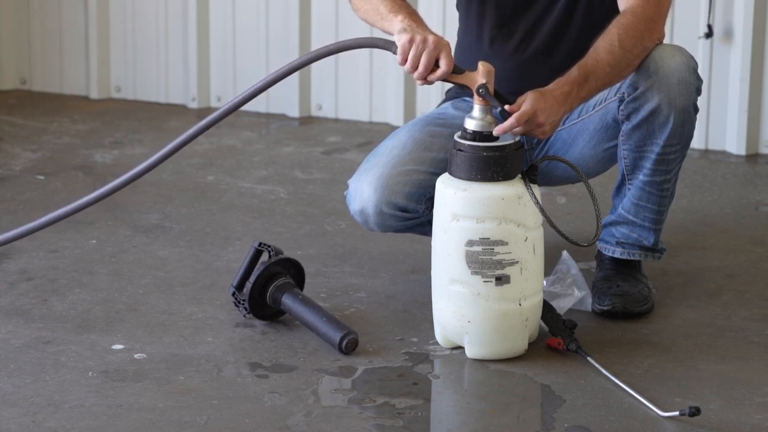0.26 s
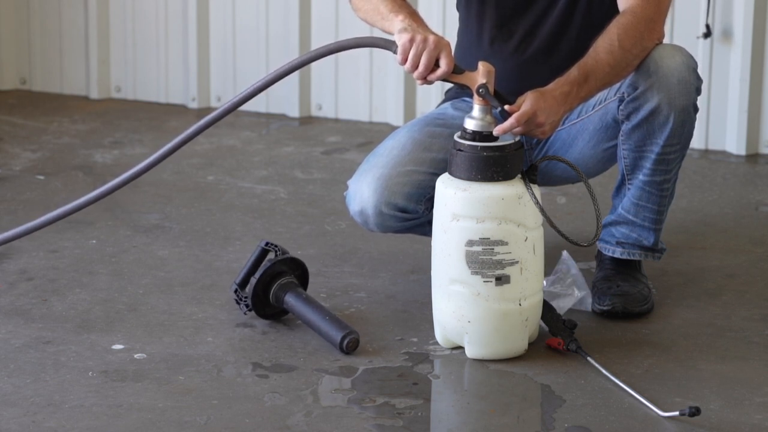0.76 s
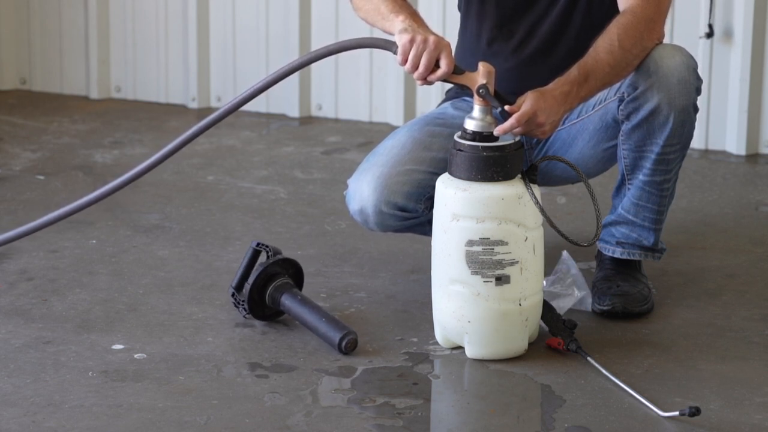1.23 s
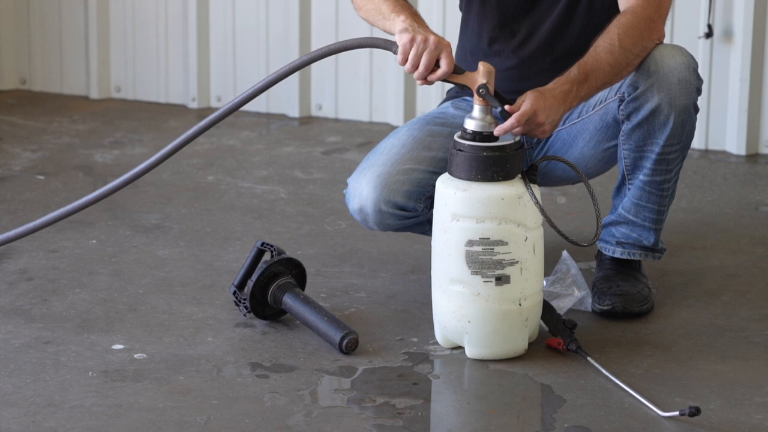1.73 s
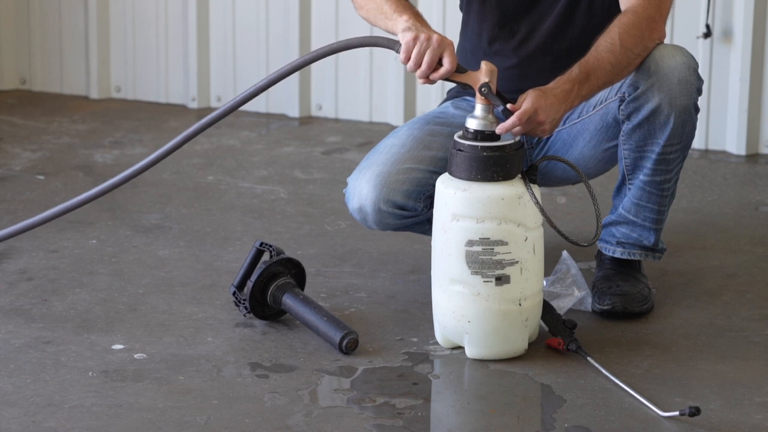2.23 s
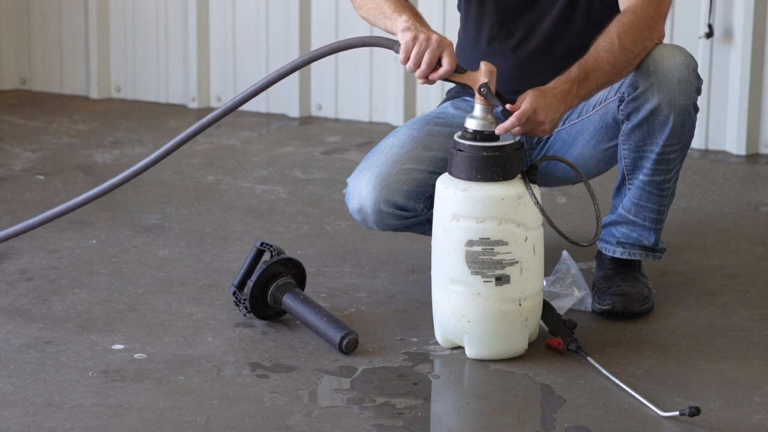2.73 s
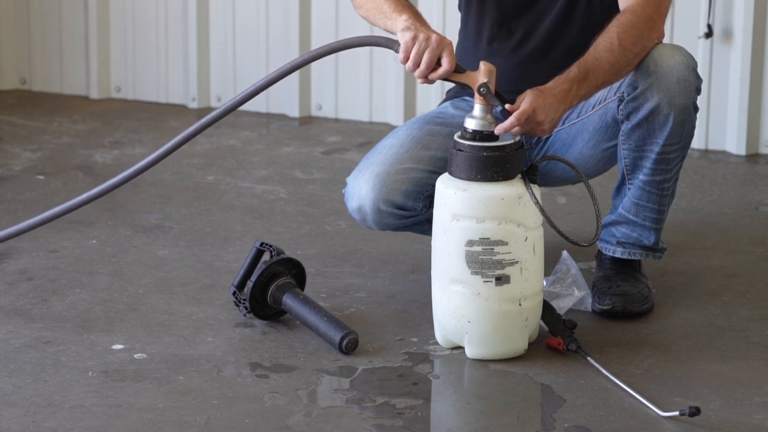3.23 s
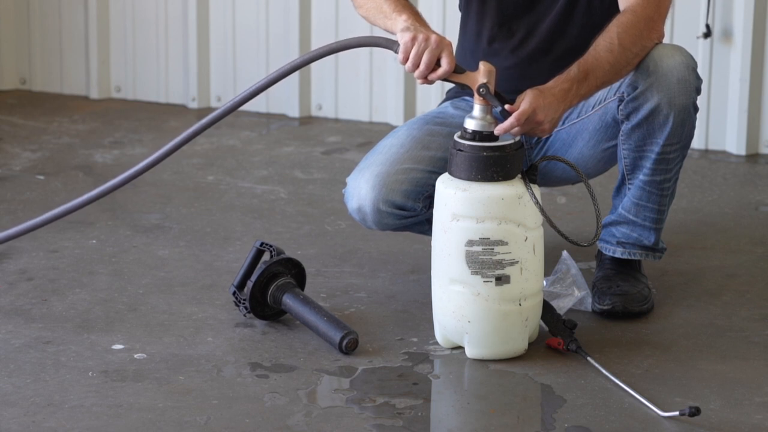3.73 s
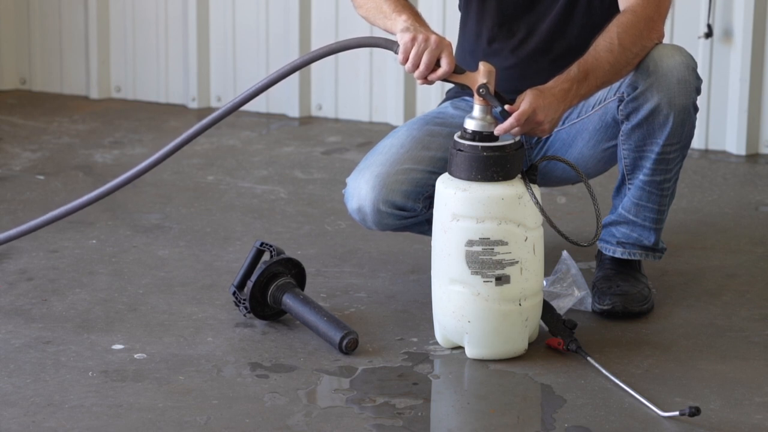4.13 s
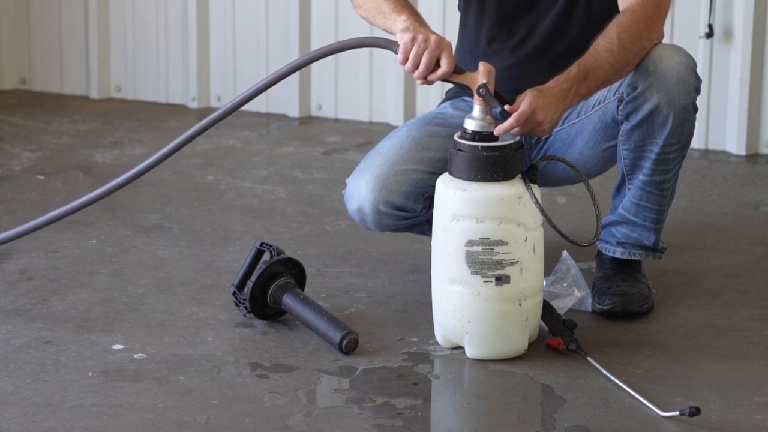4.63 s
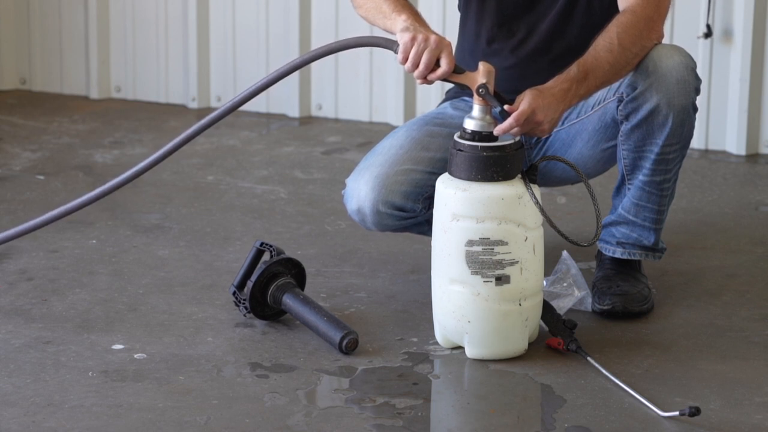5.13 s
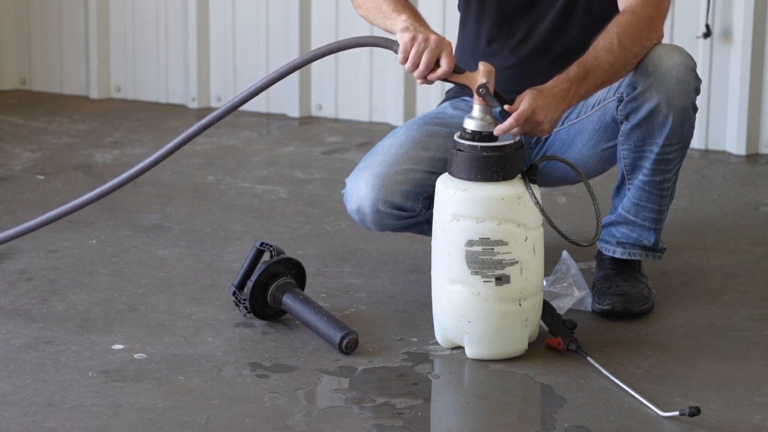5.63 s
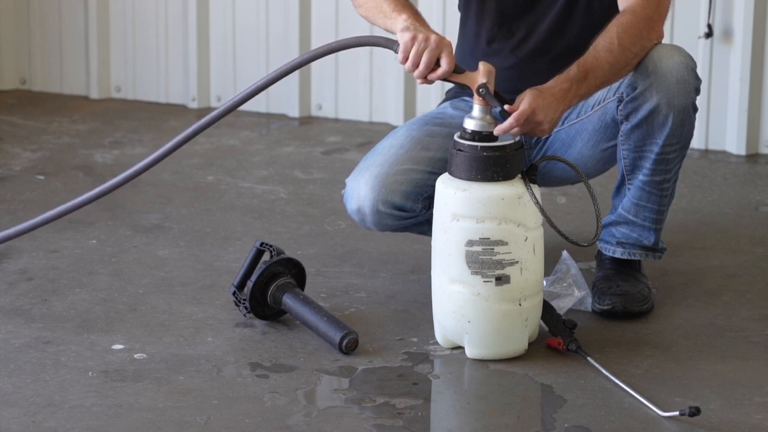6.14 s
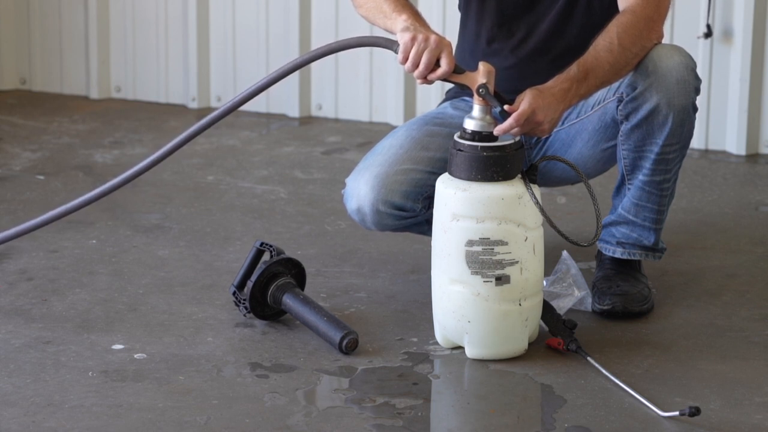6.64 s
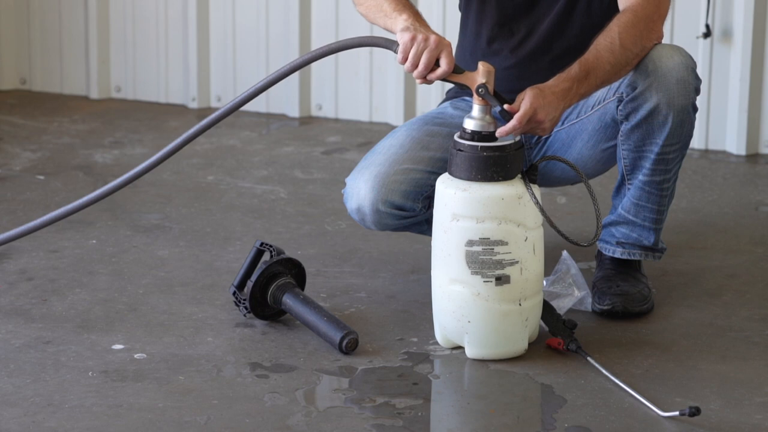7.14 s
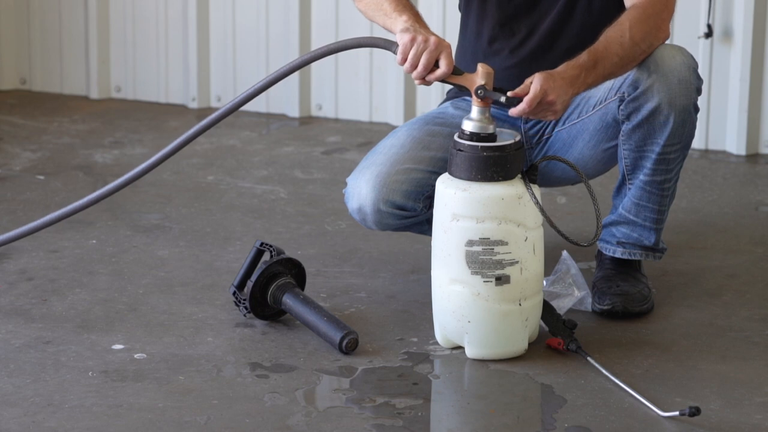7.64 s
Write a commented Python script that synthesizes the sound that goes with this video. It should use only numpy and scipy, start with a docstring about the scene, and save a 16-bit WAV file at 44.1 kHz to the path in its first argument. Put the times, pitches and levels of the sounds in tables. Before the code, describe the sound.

A strong water jet is already running at 0 s, a dense, bright hiss with fine misty treble and plastic tank resonances, fluttering slightly but nearly constant. For the first second or so it drums faintly on the bare bottom, a hollow low-mid tone that fades. A weak, breathy air note climbs slowly as the tank fills. Low rumble with soft separate thumps grows from about 1.6 s, thickens after 2 s and peaks in heavy buffets at 3.3 to 3.45 s, with smaller ones until about 4.4 s. From roughly 4.7 s the deeper water churns in low throbbing surges, with gurgles strongest around 7.1 to 7.6 s. The hiss softens gradually throughout, then falls faster from 7.45 s until the end near 8 s, its treble dropping quicker. Everything is centred in mono, close, with a short garage reverberation and no extreme treble.

```python
"""A hose nozzle jets water into a plastic sprayer tank on a garage floor.
At first the jet drums on the nearly bare bottom; its spray, shaped noise, hisses in the tank throughout.
The air note, a narrow band of noise, climbs as the tank fills. A draught of low rumble and single thumps
builds to a peak at 3.4 s and dies away. Meanwhile the deepening water starts to churn in low, surging bands.
From 7.45 s the hiss dies down faster."""
import sys
import numpy as np
from scipy.fft import rfft, irfft
from scipy.io import wavfile
from scipy.ndimage import uniform_filter1d

SR = 44100
rng = np.random.default_rng(int(sys.argv[2]) if len(sys.argv) > 2 else 0)


def file_out(sig):
    """Save sig as 16-bit WAV at sys.argv[1]."""
    # one column per channel
    cols = np.atleast_2d(sig).T
    # limit, then scale
    lim = np.clip(cols, -1, 1)
    pcm = np.round(lim * 32767).astype(np.int16)
    wavfile.write(sys.argv[1], SR, pcm)


N = 347502
T = np.arange(N) / SR  # time of every sample, in seconds
HZ = np.maximum(np.arange(N // 2 + 1) * SR / N, 1)  # frequency of every spectrum step


def hiss(body_db, mist_db, splash_db, sparkle_db):
    """Fine mist makes the top of the spray, coarse splashing its middle; each follows its own level."""
    sound = spray(wander_db=1.0)
    mist = 1 / (1 + (9200 / np.maximum(HZ, 1000)) ** 40)  # above about 9200 Hz
    splash = 1 / (1 + ((HZ - 2175) / 290) ** 8)  # a band around 2175 Hz
    body = 1 - mist - splash
    sparkle = from_db(sparkle_db * bell(centre_hz=15400, width_hz=1800))
    parts = [(body, body_db), (mist * sparkle, mist_db), (splash, splash_db)]
    return sum(shaped(sound, share) * from_db(db) for share, db in parts)


def spray(wander_db):
    """Impacts heard through the tank's resonances; rising water covers the plastic and shifts the colour."""
    # Colour of the spray. Each row: frequency in Hz, level in dB per Hz with the tank empty,
    # level in dB per Hz with it filled. Only the differences within a column matter.
    spray_colour = [(300.0, -14, -17.5), (660, -16.5, -18.5), (1080, -13, -17), (1610, -8, -14),
                    (2150, -2.5, -4), (2500, -5.5, -7.5), (3710, -6.5, -9.5), (4370, -1.5, -7),
                    (5360, -6, -10.5), (7060, -4.5, -7), (7800.0, -1.5, -3.5), (9800, -7, -12),
                    (11140, -5, -6), (15700, -7.5, -6.5)]
    # Steady resonances of the tank and the space round it.
    # Each row: frequency in Hz, width in Hz, lift in dB.
    tank_modes = [(465, 40, 2.5), (905, 55, 11), (1189, 32, 6.5), (1283, 45, 9), (1360, 100, 7.5),
                  (1488, 27, 5), (1775, 70, 4), (1900, 70, 3.5), (2047, 24, 6), (2234, 55, 5),
                  (2351, 30, 7), (2464, 38, 6), (2955, 26, 4.5), (3644, 20, 7), (4203, 26, 6),
                  (4294, 24, 5), (4365, 30, 3), (4520, 90, 4), (4685, 36, 6), (4900, 90, 2.5),
                  (5191, 27, 7), (5735, 30, 6), (5912, 22, 5.5), (6572, 48, 5), (6772, 32, 7),
                  (7020, 120, -3), (7215, 22, 5), (7740, 80, 3), (8926, 210, 3.2), (12400, 380, 2)]
    drive = garage(impacts(drops_per_s=7000, size_spread_db=3, drops_db=-6.5, flutter_db=0.47))
    lift = sum(db * bell(hz, width) for hz, width, db in tank_modes)
    empty, filled = [shaped(drive, from_db(db + lift)) for db in in_frequency(spray_colour)]
    fill = T / T[-1]  # 0 to 1
    spectrum = rfft((1 - fill) * empty + fill * filled)
    # the jet's aim wanders, so each half octave swells a little on its own, the low bands more than the top
    step = np.clip(2 * np.log2(HZ / 1000), 0, 8)
    out = 0
    for k in np.arange(9):
        band = irfft(spectrum * np.maximum(1 - np.abs(step - k), 0), N)
        out = out + band * from_db(wander_db * (1 - k / 12) * drift(8.5))
    return out


def impacts(drops_per_s, size_spread_db, drops_db, flutter_db):
    """Droplets of uneven size strike the water within the smooth rush of the fluttering jet."""
    sizes = from_db(size_spread_db * np.minimum(rng.exponential(1, N), 4)) * rng.choice([-1, 1], N)
    drops = rms_one(sizes * (rng.random(N) < drops_per_s / SR))
    rush = rng.standard_normal(N)
    return (rush + from_db(drops_db) * drops) * from_db(flutter_db * drift(25))


def jet_level(start_db, sink_db_per_s, ease_db_per_s):
    """Level of one part of the jet's sound: a slow fall while filling, a quick one at the end."""
    ease_off_s = 7.45  # the quick fall starts here
    return start_db - sink_db_per_s * T - ease_db_per_s * np.maximum(T - ease_off_s, 0)


def neck_ring(ring_hz, width_hz, onset_s, early_db):
    """The gap between nozzle and neck rings in a narrow band, more strongly as the nozzle settles."""
    settled = ramp(0, onset_s)
    ring = rms_one(garage(noise(bell(ring_hz, width_hz))))
    # rises by early_db in all, half of it below the set level and half above
    return evened(ring, span_s=0.19) * from_db(early_db * (settled - .5))


def air_note(width_hz, steadying_s):
    """A narrow, noisy resonance that climbs as the air space shrinks."""
    empty_hz, fill_per_s = 785, .045  # note of the empty tank; share of the air replaced each second
    start_db, growth_db_per_s = -54.5, 0.12
    # The air note catches or falters for a moment. Each row: start in seconds, length in seconds, lift in dB.
    catches = [(2.39, 0.16, 7.5), (2.62, .11, 10), (3.0, .22, -6), (3.27, .53, 4.5), (3.9, 0.2, -3),
               (4.45, 0.41, -11), (5.35, .35, 3), (6.9, 0.44, -6.5), (7.4, .12, 4.5), (7.55, .17, -13)]
    hz = empty_hz / np.sqrt(np.maximum(1 - fill_per_s * T, .1))
    turn = 2 * np.pi * np.cumsum(hz) / SR
    # slow random strengths on both waves spread the tone into a narrow band
    note = drift(width_hz / 2) * np.cos(turn) + drift(width_hz / 2) * np.sin(turn)
    level_db = start_db + growth_db_per_s * T + swells(catches, edge_s=.06)[0]
    return evened(rms_one(note), span_s=steadying_s) * from_db(level_db)


def bottom(drum_hz, width_hz, drum_db, covered_s, fade_db_per_s):
    """The jet drums on the nearly bare plastic until water covers it."""
    modes = [(drum_hz, width_hz, 0), (285, 70, -7)]  # Hz, width in Hz, dB
    return throb(modes) * from_db(drum_db - fade_db_per_s * np.maximum(T - covered_s, 0))


def churn(drone_db, wall_db, gurgle_db, depth_db, gurgle_depth_db, drone_fade_db_per_s):
    """The cloud of entrained air throbs in surges, louder in deep water; later the walls take over the drone."""
    # Resonances of the churned water, of the walls that hold it, and of the gurgle.
    # Each row of these three: frequency in Hz, width in Hz, level in dB.
    drone_modes = [(93.4, 14.5, 0)]
    wall_modes = [(112.3, 17, 1), (146, 21, -11)]
    gurgle_modes = [(207, 18, 0.5), (220, 16, -1.5), (255.5, 30, -3.5)]
    # Surges of churning. Each row: start in seconds, length in seconds,
    # lift of drone and walls in dB, lift of the gurgle in dB.
    surges = [(4.68, 0.22, 6.5, 2), (5.0, 0.26, 11.5, 3), (5.27, 0.15, 8.5, 4.5), (5.72, .21, 9.5, 3),
              (6.16, 0.49, 8.5, 4.5), (6.94, .12, 7, 2.5), (7.15, .13, 8.5, 10), (7.39, .24, 8, 9)]
    depth = ramp(3.4, 4.7)  # 0 to 1: the water gets deep enough to churn
    surge_db, gurgle_surge_db = swells(surges, edge_s=0.058)
    deep_db = depth_db * depth + surge_db
    upper_db = gurgle_depth_db * depth ** 3 + gurgle_surge_db
    # share of the power in the drone: in shallow water the walls sound alone
    fading_share = from_db(-2 * drone_fade_db_per_s * (T - 5.0))  # doubled, as a square root follows
    deep_share = ramp(3.55, 4.87) * np.minimum(fading_share, .9)
    drone = np.sqrt(deep_share) * from_db(drone_db) * throb(drone_modes)
    walls = np.sqrt(np.maximum(1 - deep_share, 0)) * from_db(wall_db) * throb(wall_modes)
    gurgle = throb(gurgle_modes) * from_db(upper_db + gurgle_db)
    return (drone + walls) * from_db(deep_db) + gurgle


def throb(modes):
    """Turbulence sounding a few low resonances, at an even level."""
    return evened(noise(sum(from_db(db) * bell(hz, width) for hz, width, db in modes)), span_s=0.2)


def draught(buffet_db, lumpy_db, gusty_db, wake_db, wake_s, wake_top_db):
    """Lumpy rumble; each strong eddy is a pressure swing with a dip on both sides, amid smaller ones."""
    # Single buffets. Each row: time in seconds, peak in dB before buffet_db is added, frequency in Hz.
    buffets = [(.332, -35.5, 41.7), (.436, -34, 46), (.676, -23.5, 42), (.817, -35, 50), (1.611, -29.5, 38),
               (1.684, -36, 50), (1.926, -31, 42.3), (2.078, -21.5, 108), (2.103, -18, 63.6),
               (2.240, -22.5, 55), (2.295, -23, 42), (2.596, -20.5, 37.8), (2.795, -25.5, 42),
               (3.088, -21.5, 42.5), (3.139, -16.5, 48), (3.264, -15, 52.5), (3.336, -5.5, 50),
               (3.39, -18, 38), (3.437, -8.5, 40.3), (3.569, -23.5, 46.3), (3.724, -20.5, 38),
               (3.782, -12.5, 59), (3.855, -14, 74), (3.870, -16.5, 84), (3.906, -23.5, 100),
               (4.106, -23, 41.8), (4.193, -19.5, 42), (4.365, -25, 50.4), (4.887, -33, 34),
               (5.2, -27.5, 42)]
    # Colour of the rumble. Each row: frequency in Hz, relative level in dB per Hz.
    rumble_colour = [(12, -24), (25, 5), (42, 2), (70, -2.5), (110, -11.5), (170, -33), (300, -40.5),
                     (600, -66)]
    peak_s, peak_db, build_db_per_s, die_db_per_s = 3.38, -39, 4.5, 5.5
    eddies = rng.standard_normal(N) * from_db(lumpy_db * np.clip(drift(22), -1.5, 1.5))
    rumble = evened(shaped(eddies, from_db(in_frequency(rumble_colour)[0])), span_s=0.18)
    since_peak = T - peak_s
    arc_db = np.minimum(build_db_per_s * since_peak, -die_db_per_s * since_peak)
    strength = from_db(peak_db + arc_db + gusty_db * np.clip(drift(5.4), -2, 1.5))
    thumps = 0
    for s, db, hz in buffets:
        swing = (np.pi * hz * (T - s)) ** 2
        thumps = thumps + from_db(db + buffet_db) * (1 - 2 * swing) * np.exp(-np.minimum(swing, 50))
        # the rumble is at least this strong around the thump
        flurry = from_db(min(db + wake_db, wake_top_db)) / (1 + np.square(((T - s) / wake_s) ** 2))
        strength = np.maximum(strength, flurry)
    return thumps + rumble * strength


def garage(x):
    """Direct sound plus a dense, duller tail from the concrete and sheet-metal walls."""
    t60_s, tail_db, dull_hz = 0.36, -8.5, 10100  # time to fade by 60 dB, level, where the treble fades
    tail = rng.standard_normal(N) * from_db(-60 * T / t60_s) * (T > .004)
    tail *= from_db(tail_db) / np.sqrt(np.sum(tail ** 2))
    return irfft(rfft(x) * (1 + rfft(tail) / (1 + (HZ / dull_hz) ** 4)), N)


def from_db(db):
    """Decibels to gain."""
    return 10 ** (np.asarray(db) / 20)


def rms_one(x):
    """Scale to unit power."""
    return x / np.sqrt(np.mean(x ** 2) + 1e-20)


def in_frequency(rows):
    """Each level column of a spectrum at every frequency."""
    hz, *columns = np.transpose(rows)
    return [np.interp(np.log(HZ), np.log(hz), c) for c in columns]


def shaped(x, gain):
    """Filter by a gain per frequency; unit power."""
    return rms_one(irfft(rfft(x) * gain, N))


def bell(centre_hz, width_hz):
    """Shape of a resonance, 1 on top."""
    return 1 / (1 + (2 * (HZ - centre_hz) / width_hz) ** 2)


def noise(gain):
    """Random noise of a given colour; unit power."""
    return shaped(rng.standard_normal(N), gain)


def drift(rate):
    """Slow random wander with about `rate` turns a second; unit power."""
    return noise(bell(0, 2 * rate))


def evened(x, span_s):
    """Take the slow swells out of a noise."""
    return x / np.sqrt(np.abs(uniform_filter1d(x ** 2, max(int(span_s * SR), 8))) + 0.013)


def ramp(start_s, end_s):
    """Rise from 0 to 1 between two moments."""
    return np.clip((T - start_s) / (end_s - start_s), 0, 1)


def swells(rows, edge_s):
    """Events that rise, hold and fall: the lift in dB of each of their level columns, at every sample."""
    start, length, *lifts = np.transpose(rows)
    held = [np.clip(np.minimum(T - s, s + d - T) / edge_s + .5, 0, 1) for s, d in zip(start, length)]
    return np.array(lifts) @ np.array(held)


def scene():
    """Tank and draught reach one microphone, heard alike in both ears."""
    # Bursts of coarse splashing. Each row: start in seconds, length in seconds, lift in dB.
    splash_bursts = [(.3, .3, 1.5), (1.6, .35, 1.5), (5.5, 0.4, 2), (7.1, 0.44, 2)]
    spray_db = jet_level(start_db=-32.5, sink_db_per_s=0.3469, ease_db_per_s=3.5)
    mist_db = jet_level(start_db=-33.5, sink_db_per_s=0.33, ease_db_per_s=8)
    splash_db = jet_level(start_db=-44.0, sink_db_per_s=.18, ease_db_per_s=18)
    splash_db = splash_db + swells(splash_bursts, edge_s=0.14)[0]
    neck_db = jet_level(start_db=-45.5, sink_db_per_s=.2, ease_db_per_s=11)
    jet = hiss(spray_db, mist_db, splash_db, sparkle_db=3.0)
    neck = from_db(neck_db) * neck_ring(ring_hz=6555, width_hz=460, onset_s=2.7, early_db=7.0)
    air = air_note(width_hz=63, steadying_s=0.22)
    drum = bottom(drum_hz=396, width_hz=36, drum_db=-56.0, covered_s=1.0, fade_db_per_s=12)
    water = churn(drone_db=-52, wall_db=-53, gurgle_db=-63,
                  depth_db=6, gurgle_depth_db=6, drone_fade_db_per_s=2.5)
    rumble = draught(buffet_db=1.0, lumpy_db=5, gusty_db=3.0, wake_db=-12.5, wake_s=0.045, wake_top_db=-23)
    mono = jet + neck + air + drum + water + rumble
    return np.stack([mono, mono])


def record(dry):
    """The treble is cut steeply above a cutoff frequency."""
    cutoff_hz = 15750
    steepness = np.minimum(HZ / cutoff_hz, 1.02) ** 1400  # the limit keeps the power from overflowing
    return irfft(rfft(dry) / np.sqrt(1 + steepness), N)


dry = scene()
out = record(dry)
file_out(out)
```